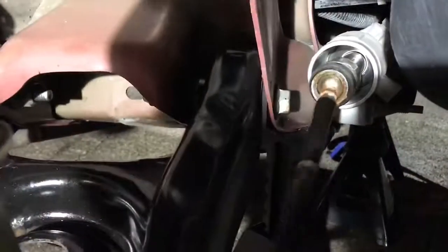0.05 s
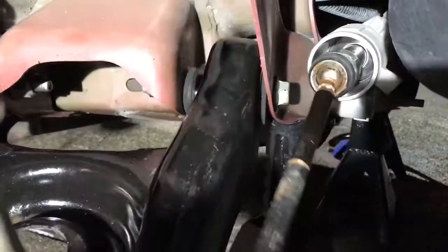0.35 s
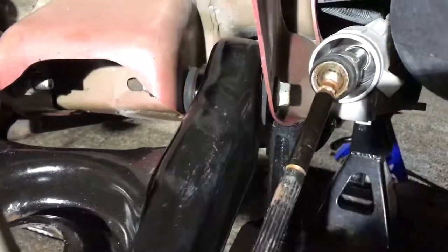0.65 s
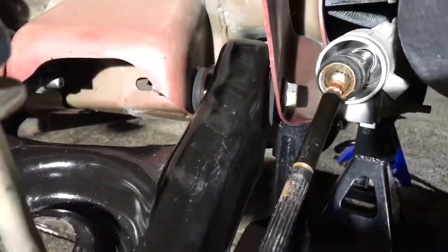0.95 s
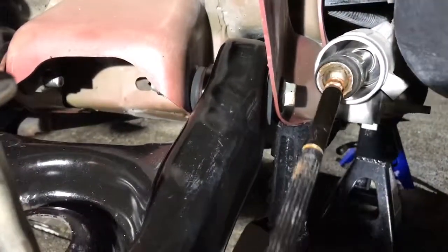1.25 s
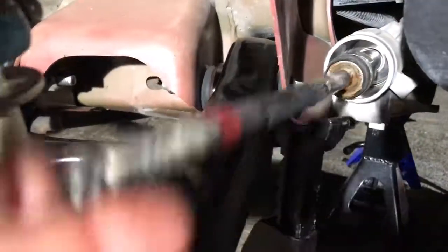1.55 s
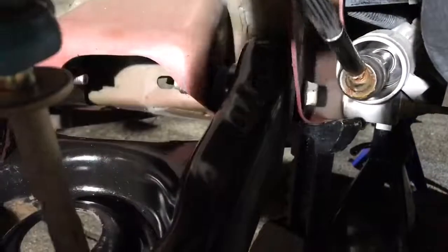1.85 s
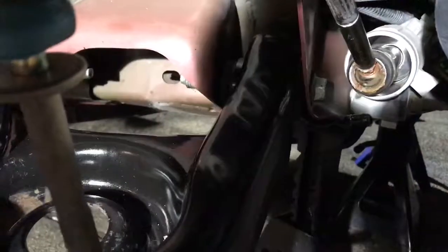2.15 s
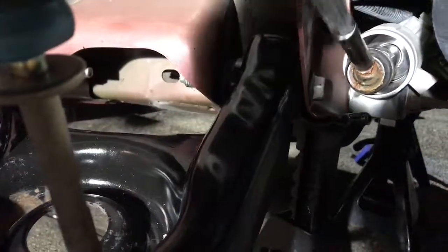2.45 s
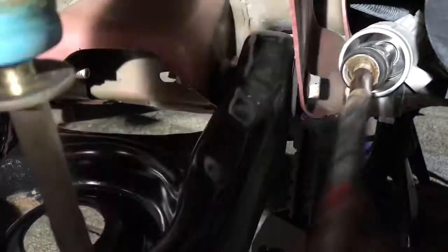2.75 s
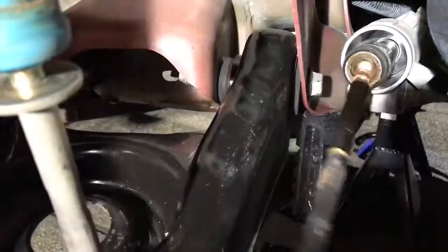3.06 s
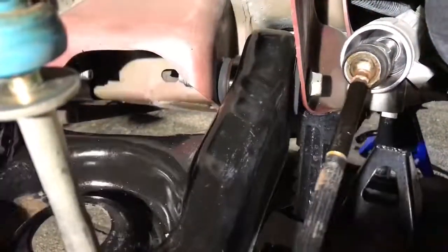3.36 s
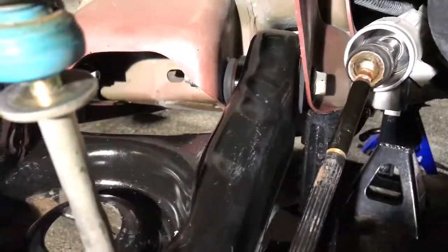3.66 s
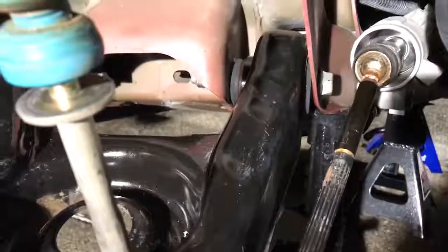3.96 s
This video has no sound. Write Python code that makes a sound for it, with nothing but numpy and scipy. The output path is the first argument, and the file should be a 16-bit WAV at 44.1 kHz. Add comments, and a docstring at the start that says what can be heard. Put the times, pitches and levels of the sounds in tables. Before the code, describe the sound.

Metal knocks and one hard clank from a loose car steering rod in a garage.

```python
"""A loose tie rod is swung by hand under a raised car in a quiet, faintly reverberant garage.
A thin high ring dies away first. Until 0.7 s the ball joint ticks and thuds at the end of its play;
at 0.5 s the rod drops on the control arm. At 2 s it taps its upper stop. From 2.7 s the joint knocks
again, and at 3.1 s the rod clanks hard on the subframe. A last knock and a faint scuff follow."""
import sys
import numpy as np
from scipy import signal
from scipy.fft import rfft, irfft
from scipy.io import wavfile

SR = 44100
rng = np.random.default_rng(int(sys.argv[2]) if len(sys.argv) > 2 else 0)


def master(y):
    """Save y as 16-bit WAV."""
    cut = np.clip(np.atleast_2d(y).T, -1, 1)
    pcm = np.round(cut * 32767)  # scale
    wavfile.write(sys.argv[1], SR, pcm.astype(np.int16))


N = 176400
RING_TIME_S = np.arange(round(.4 * SR)) / SR

# noise spectra: (frequency [Hz], relative density [dB])
AIR_SPECTRUM = [(15, -43), (25, -12), (53, -10), (110, 1), (150, -4), (421, -4.5), (848, -9.5), (1100, -15),
                (1340, -10), (1600, -20), (2770, -25), (3300, -14), (3830, -27), (5700, -31), (6700, -28),
                (7800, -33), (15500, -36)]
SCUFF_SPECTRUM = [(2000, -25), (5000, -8), (12500, 0), (16000, -5)]
# garage tail: (frequency [Hz], level [dB], t60 [s])
GARAGE_REVERB = [(150, -15, .85), (480, -17.5, .78), (850, -24, .62), (1400, -27.5, .6), (3000, -31, .55),
                 (6000, -33, .5), (12000, -37, .38)]
# rod scuffs: (time [s], length [s], level [dB])
SCUFFS = [(.448, .02, -75), (3.415, .13, -78)]
# steel modes: (frequency [Hz], relative level [dB], t60 [s])
PING_MODES = [(484, -50, .28), (1071, -56, .15), (2412, -53, .15), (2450, -51, .11), (13600, -36.5, .17)]
BALL_MODES = [(4818, -58, .09), (5270, -52, .08), (5420, -52, .11), (6961, -55, .08), (7590, -52, .07)]
ROD_MODES = [(1502, -54, .18), (1906, -53, .12), (2837, -50, .11), (4452, -61, .09), (5959, -60, .08)]
RACK_MODES = [(275, -33.5, .13), (512, -45, .15), (650, -40, .15), (692, -34, .2), (730, -41, .15),
              (829, -43, .14), (1065, -44, .12), (1290, -45, .11), (1636, -42, .14), (1701, -41, .13)]
RACK_CLACK_MODES = [(740, -24, .035), (1660, -41, .05)]
ARM_MODES = [(495, -40, .12), (670, -42, .1), (870, -37, .09), (894, -38, .34), (1292, -29, .08),
             (1400, -34.5, .11), (1464, -37, .11), (2132, -41, .06), (2590, -43, .06), (2930, -42, .06),
             (3230, -45, .06)]
STOP_MODES = [(275, -57, .22), (475, -54, .14), (1002, -49.5, .24), (1160, -56, .15), (1432, -55, .14),
              (1502, -59, .2), (2471, -69, .35), (2934, -64, .21), (4221, -72, .27)]
FRAME_MODES = [(356, -32, .16), (436, -27.5, .19), (491, -29, .16), (665, -31, .11), (861, -19, .11),
               (1002, -24.5, .13), (1161, -22, .11), (1276, -18, .1), (1318, -21, .08), (1410, -20, .08),
               (1548, -18.5, .09), (2154, -17.5, .07), (2609, -25, .075), (2719, -26, .08),
               (2906, -22, .085), (4977, -25.5, .09), (5389, -30, .1), (7942, -26, .075)]
# dense ringing: (frequency [Hz], relative octave-band level [dB])
PING_SPECTRUM = [(40, -80), (200, -63), (600, -53), (2400, -57), (4000, -63), (10000, -50), (15000, -63)]
TICK_SPECTRUM = [(40, -85), (300, -64), (800, -52), (2500, -55), (3900, -56), (5400, -45.5), (6300, -49),
                 (7400, -45), (9000, -49), (12000, -48), (15500, -63)]
THUD_SPECTRUM = [(40, -84), (190, -52), (320, -42.5), (600, -41), (1000, -40), (1600, -44), (2200, -47.5),
                 (3100, -46), (4000, -59), (14000, -73)]
ARM_SPECTRUM = [(80, -72), (200, -51), (600, -44), (1300, -37), (2400, -39), (4500, -52), (15500, -65)]
STOP_SPECTRUM = [(150, -74), (700, -64), (1200, -53), (2000, -66), (5000, -69), (7000, -79), (14000, -81)]
FRAME_SPECTRUM = [(70, -57), (130, -44), (220, -34.5), (600, -33), (1300, -26), (2400, -25), (3800, -28),
                  (6500, -26), (12500, -34.5), (15000, -62)]
CRACK_SPECTRUM = [(40, -64), (400, -36), (900, -27), (1400, -21), (2000, -18), (2900, -20), (3800, -23),
                  (6000, -19.5), (8000, -18.5), (10000, -26), (12800, -30), (15000, -54)]
# decay of dense ringing: (frequency [Hz], base t60 [s])
DENSE_T60 = [(100, .2), (300, .18), (600, .17), (1200, .135), (2500, .105), (5500, .108), (12000, .088)]
# joint knocks: (time [s], thud gain [dB], rack gain [dB], rod gain [dB], chatter [s],
# tick gain [dB], tick tilt [dB/octave])
KNOCKS = [(.092, -5, -8, -5, .014, -3, -1.5), (.271, -9, -17, -9, .018, -15, -3.5),
          (.409, -11.5, -20, -11, .018, -20, -3.5), (.647, -23, -34, -22, .008, -27, -3),
          (2.7277, -1.5, -2, -8, .011, 0, 0), (3.009, -7.5, -15, -7, .018, -7.5, -2),
          (3.268, -20, -32, -18, .03, -21, -5)]
# steel chatter at a hard blow or rebound: (time [s], hold [s], gain [dB], tilt [dB/octave])
CRACKS = [(.4962, .004, -27, -1.5), (3.0926, .009, 1, 0), (3.1005, .002, -10, -1.5)]
# rod blows: (time [s], hold [s], dense t60 scale, gain [dB])
ON_ARM, ON_STOP, ON_FRAME = (.4955, .006, .95, 0), (2.012, .012, 1.2, -2), (3.0926, .005, .95, 0)


def amp(db):
    """Decibels to gain."""
    return 10 ** (np.asarray(db) / 20)


def lookup(table, hz, column=1):
    """Table column, interpolated over log frequency."""
    columns = np.transpose(table)
    return np.interp(np.log(hz + 1), np.log(columns[0] + 1), columns[column])


def add(mix, time_s, sound):
    """Mix a sound in at time_s."""
    part = mix[round(time_s * SR):][:len(sound)]
    part += sound[:len(part)]


def noise(spectrum, size):
    """Shaped noise, rms 1."""
    gain = amp(lookup(spectrum, np.fft.rfftfreq(size, 1 / SR)))
    x = irfft(rfft(rng.standard_normal(size)) * gain, size)
    return x / x.std()


def grain(size=len(RING_TIME_S)):
    """Random signs: a pattern of countless close modes."""
    return np.sign(rng.random(size) - .5)


def bands(x):
    """Centres and signals of 13 bands that sum to x."""
    centres_hz = np.geomspace(60, 15000, 13)
    hz = np.fft.rfftfreq(len(x), 1 / SR)
    shares = np.array([np.interp(hz, centres_hz, row) for row in np.eye(len(centres_hz))])
    return centres_hz[:, None], irfft(rfft(x) * shares, len(x))


def envelope(hz, hold_s, t60_s, rise_cycles=3.2, max_rise_s=.02, linger_s=.014, linger_hz=450):
    """Rise over a few cycles, hold while parts chatter, decay."""
    rise_s = np.minimum(rise_cycles / hz, max_rise_s)
    fall_start_s = hold_s + linger_s / (1 + (hz / linger_hz) ** 2)  # underbody-floor echoes hold bass
    fall = np.exp(-np.log(1000) / t60_s * np.maximum(RING_TIME_S - fall_start_s, 0))
    return np.minimum(RING_TIME_S / rise_s, 1) * fall


def ring(modes, hold_s):
    """Separate strong modes of a part, random phases."""
    return sum(amp(db) * envelope(hz, hold_s, t60_s)
               * np.sin(2 * np.pi * (hz * RING_TIME_S + rng.random())) for hz, db, t60_s in modes)


def dense_ring(pattern, spectrum, hold_s, t60_scale=1, tilt_db_per_oct=0):
    """Close modes of a steel assembly; treble dies first."""
    hz = np.maximum(np.fft.rfftfreq(len(pattern), 1 / SR), 30)
    octave_db = lookup(spectrum, hz) + tilt_db_per_oct * np.log2(hz / 6000)
    gain = amp(octave_db) * np.sqrt(SR / 2 / (hz * np.log(2)))  # per octave to per bin
    centres_hz, parts = bands(irfft(rfft(pattern) * gain, len(pattern)))
    t60_s = t60_scale * lookup(DENSE_T60, centres_hz)
    return (parts * envelope(centres_hz, hold_s, t60_s)).sum(0)


def varied(modes, spread_db=3):
    """Each seating of the ball excites the modes differently."""
    return [(hz, db + spread_db * rng.uniform(-1, 1), t60_s) for hz, db, t60_s in modes]


def air(rms_db=-67):
    """Steady air of the garage."""
    return amp(rms_db) * noise(AIR_SPECTRUM, N)


def garage_reverb(x, build_s=.02, tail_s=.8):
    """Weak diffuse tail, longest and strongest in the bass."""
    hz, parts = bands(grain(round(tail_s * SR)))
    t = np.arange(parts.shape[1]) / SR
    t60_s = lookup(GARAGE_REVERB, hz, column=2)
    shape = (1 - np.exp(-t / build_s)) * np.exp(-np.log(1000) * t / t60_s)
    shape /= np.linalg.norm(shape, axis=1, keepdims=True)
    tail = (parts * amp(lookup(GARAGE_REVERB, hz)) * shape).sum(0)
    return signal.fftconvolve(x, tail)[:N]


def scuffs():
    """The rod rubs lightly: brief swells of hiss."""
    out = np.zeros(N)
    for time_s, length_s, db in SCUFFS:
        size = round(length_s * SR)
        add(out, time_s, amp(db) * np.hanning(size) * noise(SCUFF_SPECTRUM, size))
    return out


def ping():
    """A small steel part rings out at the start."""
    out = np.zeros(N)
    add(out, 0, ring(PING_MODES, hold_s=0) + dense_ring(grain(), PING_SPECTRUM, hold_s=0, t60_scale=1.5))
    return out


def joint_knocks(tick_hold_s=.003, rack_hold_s=.012, thud_lag_s=.0025, fresh_share=.6):
    """The ball seats with a tick; then the rod rings and the steering rack clacks and thuds."""
    out = np.zeros(N)
    shared_pattern = grain()
    rack = ring(RACK_MODES, rack_hold_s) + ring(RACK_CLACK_MODES, hold_s=0)
    for time_s, thud_db, rack_db, rod_db, chatter_s, tick_db, tilt_db_per_oct in KNOCKS:
        pattern = np.sqrt(1 - fresh_share) * shared_pattern + np.sqrt(fresh_share) * grain()
        tick = dense_ring(pattern[::-1], TICK_SPECTRUM, tick_hold_s,
                          t60_scale=.85, tilt_db_per_oct=tilt_db_per_oct)
        ball = ring(varied(BALL_MODES), tick_hold_s)
        thud = dense_ring(pattern, THUD_SPECTRUM, chatter_s, t60_scale=.95)
        rod = ring(varied(ROD_MODES), chatter_s)
        add(out, time_s, amp(tick_db) * (tick + ball))
        add(out, time_s + thud_lag_s, amp(thud_db) * thud + amp(rack_db) * rack + amp(rod_db) * rod)
    return out


def rod_strikes(crack_t60_scale=.25):
    """The rod hits control arm, upper stop and subframe; on hard blows steel chatters with a crack."""
    out = np.zeros(N)
    for blow, modes, spectrum in [(ON_ARM, ARM_MODES, ARM_SPECTRUM),
                                  (ON_STOP, STOP_MODES, STOP_SPECTRUM),
                                  (ON_FRAME, FRAME_MODES, FRAME_SPECTRUM)]:
        time_s, hold_s, t60_scale, db = blow
        clank = ring(modes, hold_s) + dense_ring(grain(), spectrum, hold_s, t60_scale)
        add(out, time_s, amp(db) * clank)
    for time_s, hold_s, db, tilt_db_per_oct in CRACKS:
        crack = dense_ring(grain(), CRACK_SPECTRUM, hold_s, crack_t60_scale, tilt_db_per_oct)
        add(out, time_s, amp(db) * crack)
    return out


def scene():
    """Steel sounds, their reverberation and the air; mono."""
    steel = joint_knocks() + rod_strikes() + ping() + scuffs()
    return (steel + garage_reverb(steel) + air())[None]


def record(dry, ceiling=.7, threshold=.3, duck_db=6, lag_s=.052, recover_db_per_s=35, cutoff_hz=15800):
    """Soft clip; late gain drop and recovery after each overload; low-pass."""
    t = np.arange(N) / SR
    last_overload_s = np.maximum.accumulate(np.where(abs(dry[0]) > threshold, t, -10))
    cut_db = np.maximum(duck_db - recover_db_per_s * (t - last_overload_s), 0)
    clipped = ceiling * np.tanh(dry / ceiling)
    ducked = clipped * amp(-np.interp(t - lag_s, t, cut_db))
    lowpass = signal.firwin(511, cutoff_hz, window=("kaiser", 9), fs=SR)
    return signal.oaconvolve(ducked, lowpass[None], "same")


dry = scene()
out = record(dry)
master(out)
```